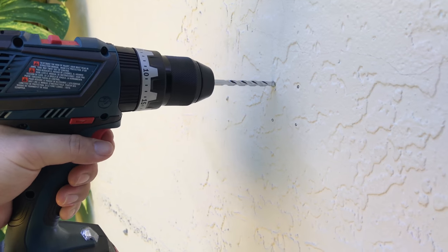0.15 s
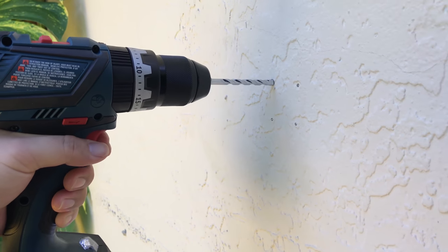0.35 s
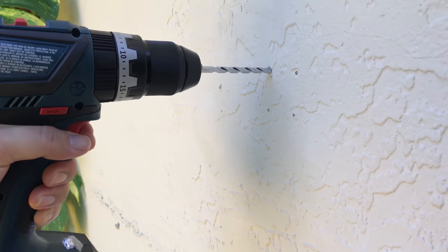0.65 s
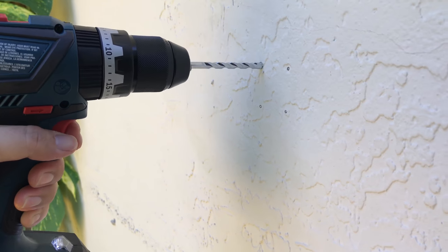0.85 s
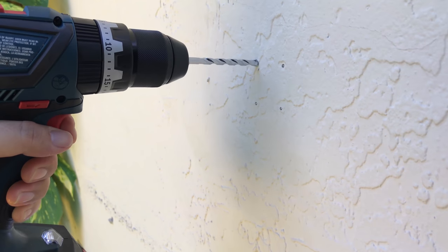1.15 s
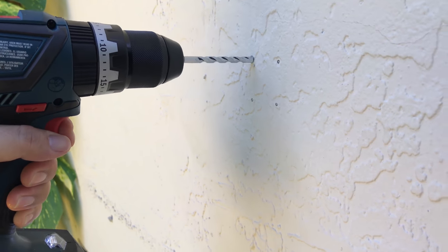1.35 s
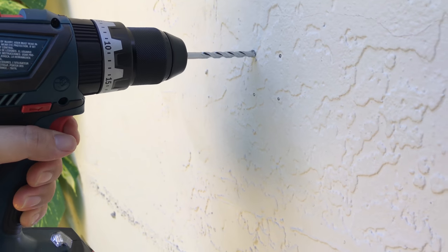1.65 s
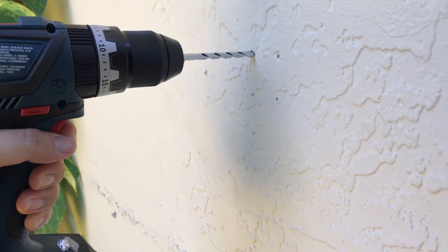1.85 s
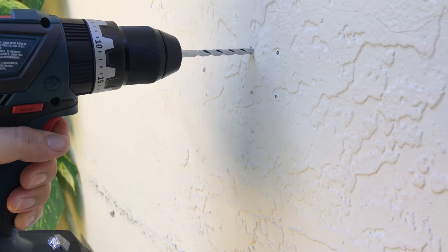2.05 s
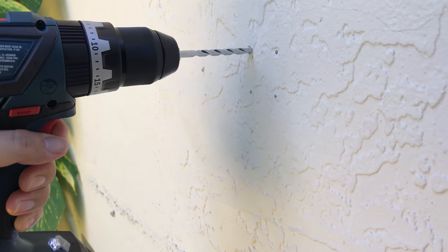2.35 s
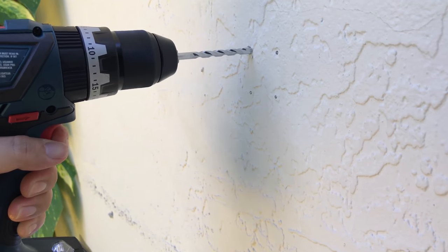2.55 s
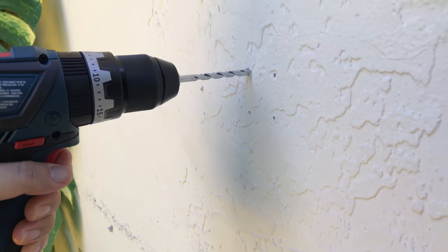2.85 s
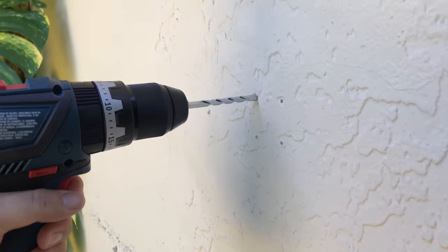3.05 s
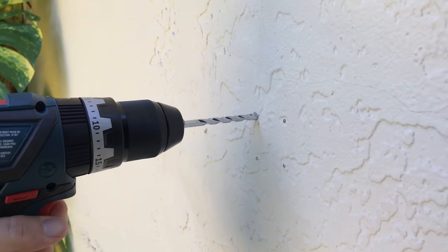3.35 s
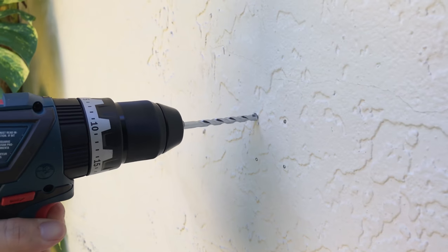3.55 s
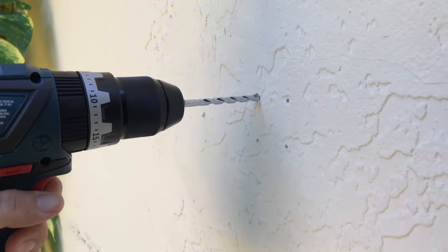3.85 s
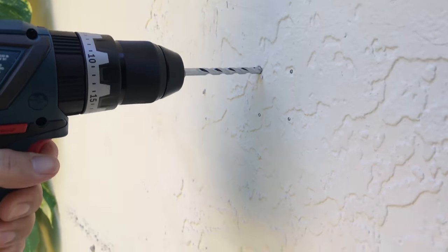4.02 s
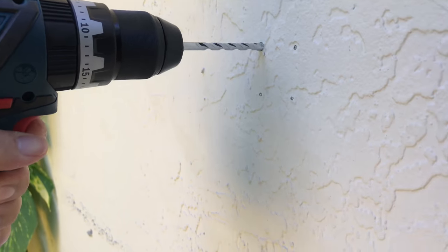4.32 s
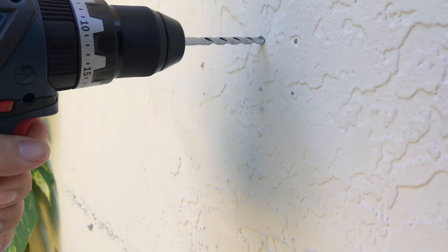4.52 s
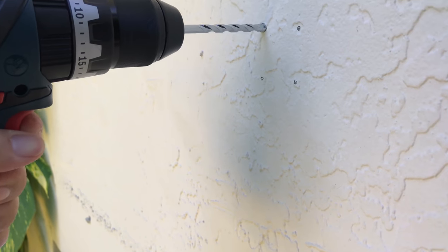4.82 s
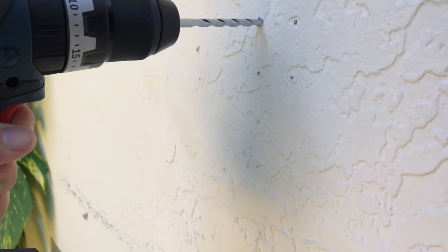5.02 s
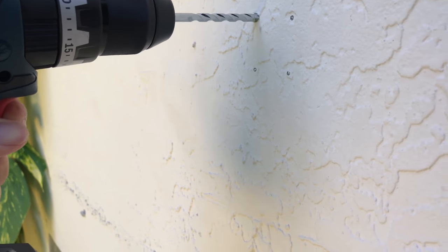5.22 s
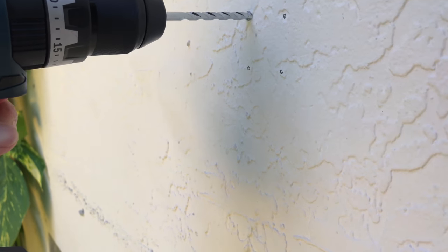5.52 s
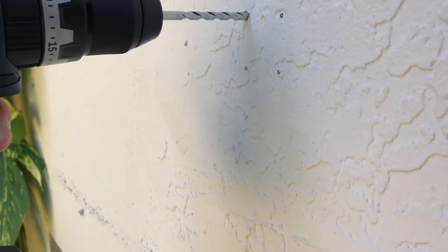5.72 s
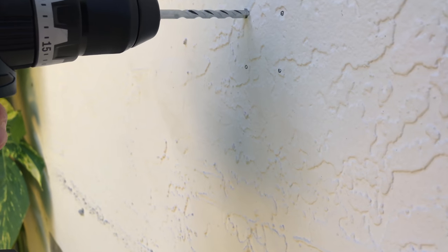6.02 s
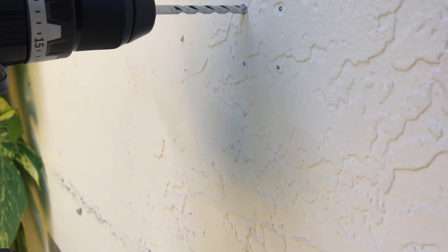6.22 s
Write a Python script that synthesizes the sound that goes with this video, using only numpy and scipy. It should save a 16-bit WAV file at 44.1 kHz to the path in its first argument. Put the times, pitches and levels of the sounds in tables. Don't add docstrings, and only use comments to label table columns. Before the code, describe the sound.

A close phone recording of a cordless hammer drill in a yard. First only low hum, tyre noise, a distant chugging motor and insects. The trigger closes with a short growl and rising cry; rapid blows fuse into a loud gritty grinding with a steady piercing whine and metallic jaw rattle. Bursts of fan air thump the microphone, growing rougher later. The drill never stops.

```python
import sys
import numpy as np
from scipy import signal
from scipy.fft import rfft, irfft, next_fast_len
from scipy.io import wavfile
from scipy.ndimage import uniform_filter1d, map_coordinates

SR = 44100
rng = np.random.default_rng(int(sys.argv[2]) if len(sys.argv) > 2 else 0)


def dump_mix(stems):
    frames = np.atleast_2d(stems).T
    limited = np.clip(frames, -1, 1)
    pcm = np.round(limited * 32767).astype(np.int16)
    wavfile.write(sys.argv[1], SR, pcm)


def amplitude_ratio(level_db):
    exponent = np.asarray(level_db, float) / 20
    return 10 ** exponent


N = 281358

# time in seconds, passing tyres in dB, engine in dB.
YARD = [(0, -49.5, -58), (.25, -52.5, -60), (.55, -53, -55), (.85, -51, -55), (1.25, -56.5, -56),
        (1.55, -57, -57.5), (1.85, -57.5, -54)]
# frequency in Hz, level in dB per Hz.
FAR_TONE = [(15, -54), (25, -46), (53, 0.5), (117, -1), (145, -7.5), (236, -5), (476, -15), (962, -11),
            (2760, -14.5), (3340, -11.5), (4030, -22.5), (5880, -8), (7710, -18.5), (13600, -23),
            (16000, -27)]
# centre in Hz, width in Hz, level in dB.
COWL = [(2350, 320, -9), (3340, 900, -9), (4140, 510, 6.5)]
HUM_DB, INSECTS_DB = -52, 7
CHUG_START_S, CHUG_PERIOD_S, CHUG_JITTER_S, CHUG_DB, CHUG_SCATTER_DB = 0.71, 0.0615, 0.0054, 0.5, 2.2

# time in seconds, peak in dB.
RATTLE = [(1.9143, -28), (1.9477, -28), (1.98, -28), (1.998, -35), (2.0231, -26), (2.043, -28), (2.06, -32),
          (2.1138, -25), (2.126, -27), (2.142, -30), (2.479, -28), (2.5788, -31), (2.8661, -31),
          (2.9075, -21), (3.3056, -29), (3.384, -26), (3.4408, -29), (3.4982, -28), (3.8753, -30),
          (3.9766, -28), (4.1901, -33), (4.3478, -32), (4.5034, -22), (5.1075, -28), (5.6757, -30),
          (5.8229, -30), (5.9461, -25), (5.996, -27)]
CHATTER_PER_S, CHATTER_DB, CHATTER_SCATTER_DB = 14, -35, 1.6
TICK_S, TICK_DB = 1.08, -52
JAWS_LAG, JAWS_DECAY, JAWS_LOOSE = 0.21, 0.27, 0.41

# time in seconds, level in dB, treble in dB, hammer share from 0 to 1.
START = [
    (1.868, -61, -12, 0.48),
    (1.882, -50, -12, 0.28),
    (1.9, -32, -4, 0.6),
    (1.915, -33.5, -4, 0.56),
]
# time in seconds, level in dB.
LOAD = [(1.94, -29.5), (2.0, -29.5), (2.1, -32.5), (3.0, -34), (4.59, -31.5), (5.36, -35.5), (5.66, -33),
        (6.03, -32), (6.38, -34.5)]
# frequency in Hz, level in dB per Hz.
BODY = [(150, -50), (300, -22), (500, -9), (750, -4), (1000, -2.5), (2000, -2), (4000, -1), (7500, -7),
        (11000, -0.5), (15700, -5)]
# centre in Hz, width in Hz, level in dB.
STEEL = [(1570, 700, -9.5), (1895, 920, 0), (3090, 190, -9), (4360, 410, 1), (6340, 1940, 5.5),
         (8280, 450, 0), (9680, 130, 4), (12500, 1800, -2.5), (14300, 750, 1.5)]
# frequency in Hz, level in dB.
STRIKE = [(500, 7.5), (1200, -6), (2500, 1.5), (5000, -3.5), (9000, -8), (14000, -6.5)]
# time in seconds, share (its sign picks which blows).
LIMP = [(2.65, -0.17), (2.85, 0.53), (3.3, 0.46), (3.4, 0.16), (4, -0.051), (4.2, 0.029), (4.7, -.05),
        (4.9, -0.45), (5.1, 0.11), (6.3, -0.33)]
# low edge in Hz, high edge in Hz, size scatter in dB,
# sharp edge over the grinding as a plain factor.
RANGES = [
    (650, 2920, 1.55, 2.95),
    (3330, 10000, 2.1, 1.4),
    (7400, 59000, 2, 1.4),
]
CRACK_DELAY = 30
BLOWS_PER_TURN, FIRST_BLOW = 16 / 55, 21.81
TREBLE_DB, DULLS_PER_DB = -2, 0.26
HAMMER_SHARE, BIT_RING_DB = 0.39, -0.5

# time in seconds, whine in Hz, whine in dB.
SPIN_UP = [(1.87, 2000, -70), (1.92, 4950, -62), (1.94, 6600, -54), (1.96, 8300, -54), (1.98, 9100, -54),
           (2, 9800, -46)]
# time in seconds, whine in Hz, whine in dB.
WHINE = [(2.03, 10131, -47), (2.075, 10274, -45), (2.165, 10067, -41.5), (2.21, 10003, -41),
         (2.3, 10020, -41.5), (2.9, 10028, -42), (2.975, 10058, -41.5), (3.2, 10115, -43),
         (3.72, 10115, -42), (3.85, 10100, -44.5), (4.24, 10082, -43.3), (4.37, 10166, -46.4),
         (4.63, 10203, -52), (4.76, 10253, -56.5), (5.02, 10322, -53.5), (5.8, 10304, -49),
         (6.06, 10292, -45), (6.32, 10281, -48)]
ORDERS = (1, 4, 8, 16, 30)
# early level in dB, late level in dB.
ORDERS_DB = [(-53.5, -54.5), (-53.5, -56), (-54.5, -48.5), (-52.5, -51.5), (-84, -82)]
SLOTS, MESH = 29, 12.364
UP_TO_SPEED_S = 2.03

# time in seconds, rumble in dB.
DRAUGHT = [(2.04, -44), (2.065, -27), (2.31, -27.5), (2.37, -38), (2.77, -25), (2.82, -33.5), (3.1, -35.5),
           (3.14, -25.5), (3.55, -36.5), (3.68, -28), (4.05, -22), (4.39, -35), (4.8, -26), (5.47, -28.5),
           (5.58, -47), (5.86, -38.5), (5.995, -25), (6.38, -32.5)]
# time in seconds, depth in dB, length in seconds.
LULLS = [(2.47, 2.5, 0.045), (2.59, 7, 0.018), (2.68, 24, 0.045), (3.62, 23, .05), (3.87, 20, 0.16),
         (4.1, 17, 0.027), (4.36, -1, 0.043), (4.69, 12, 0.018), (4.79, 21, 0.038), (5.71, 31, 0.11),
         (5.93, 22, 0.077)]
# time in seconds, eddies over the rumble in dB.
AIM = [(2, -5), (3, -6), (3.3, 3), (3.8, -8), (4.06, -6.5), (4.2, 1.5), (4.7, 3.5), (4.95, 5), (5.2, 6),
       (5.42, -4), (5.85, -3), (6.05, -2), (6.38, 2)]
# time in seconds, flutter in dB, sharp part in dB, length in seconds.
PUFFS = [(2.127, -24.5, -44.5, 0.02), (2.544, -29.5, -36, 0.038), (2.624, -31, -36, .042),
         (2.749, -53, -34, 0.027), (3.122, -29.5, -29, 0.035), (3.163, -25, -30, 0.028),
         (3.279, -22.5, -32, 0.041), (3.387, -32, -29.5, 0.026), (3.435, -24.5, -44, 0.018),
         (3.764, -29, -33, 0.031), (3.843, -29, -33, 0.026), (3.957, -24, -36.5, 0.02),
         (4.127, -23.5, -18.5, 0.017), (4.157, -21, -26, 0.023), (4.237, -28, -19.5, .01),
         (4.258, -29.5, -18.5, .02), (4.399, -24.5, -28, 0.028), (4.478, -27.5, -23, .016),
         (4.659, -17.5, -20.5, 0.021), (4.717, -26, -12, 0.014), (4.752, -49, -19, 0.0087),
         (4.811, -27, -32, 0.018), (4.921, -23, -22.5, 0.048), (4.996, -21, -20, 0.056),
         (5.142, -24, -23.5, 0.046), (5.212, -30, -20.5, 0.016), (5.254, -28, -22.5, 0.026),
         (5.348, -24, -27.5, 0.032), (6.095, -23.5, -25, 0.081), (6.225, -21, -22, 0.037)]
# frequency in Hz, level in dB per Hz.
RUMBLE = [(12, -44), (20, -19), (45, 0), (65, 6.5), (118, -1), (165, -9.5), (300, -17), (390, -51),
          (660, -120)]
# frequency in Hz, level in dB.
FLUTTER = [(60, -15), (150, 3), (250, -1), (420, -8.5), (700, -19), (1200, -75)]
# frequency in Hz, level in dB.
SHARP = [(200, 0), (450, 1), (700, 2), (1100, -5.5), (1600, -15.5), (2500, -26)]
EDDY_GAP_S, EDDY_S, EDDY_SCATTER_DB = 0.025, 0.014, 2
SHARP_DB, SHARP_GROWS = -6.5, 0.64
SPRAY_DB, SPRAY_LUMPS_DB = -19.5, 4


def unit(x):
    return x / np.sqrt(np.mean(x ** 2) + 1e-20)


def curves(rows):
    s, *cols = np.transpose(rows)
    return [np.interp(np.arange(N) / SR, s, c) for c in cols]


def wobble(rate):
    knots = rng.standard_normal(int(N * rate / SR) + 4)
    return map_coordinates(knots, [np.arange(N) * rate / SR])


def filtered(x, response):
    m = next_fast_len(N + 8192)
    return irfft(rfft(x, m) * response(np.fft.rfftfreq(m, 1 / SR)), m)[:N]


def colour(points, lo_hz=0, hi_hz=30000):
    f, db = np.transpose(points)

    def gain(hz):
        edges = (1 + (lo_hz / (hz + 1)) ** 8) * (1 + (hz / hi_hz) ** 8)
        return amplitude_ratio(np.interp(np.log(hz + 1), np.log(f), db)) / np.sqrt(edges)
    return gain


def noise(response):
    return unit(filtered(rng.standard_normal(N), response))


def modes(table):
    return lambda f: sum(amplitude_ratio(db) * 1j * f * w / (c * c - f * f + 1j * f * w) for c, w, db in table)


def after(start_s, rise_s):
    return np.clip((np.arange(N) / SR - start_s) / rise_s, 0, 1)


def bumps(rows):
    env = np.zeros(N + SR)
    for s, gain, length in rows:
        shape = np.hanning(int(1.8 * max(length, 0.004) * SR))
        env[round(s * SR) - len(shape) // 2:][:len(shape)] += gain * shape
    return env[:N]


def steady(x, span_s):
    power = np.abs(uniform_filter1d(x ** 2, int(span_s * SR)))
    return x / np.sqrt(power + 0.43)


def yard():
    tyres_db, engine_db = curves(YARD)
    beats = []
    for k, (late, size) in enumerate(rng.standard_normal((19, 2))):
        beat_s = CHUG_START_S + CHUG_PERIOD_S * k + CHUG_JITTER_S * late
        beats.append((beat_s, amplitude_ratio(CHUG_DB + CHUG_SCATTER_DB * size), 0.028))
    chug = bumps(beats)

    def road(f):
        return colour(FAR_TONE, lo_hz=550, hi_hz=1700)(f) * (1 + modes([(1000, 220, -2)])(f))

    def cowl(f):
        return colour(FAR_TONE, lo_hz=1700, hi_hz=4900)(f) * (1 + modes(COWL)(f))

    def chirp(f):
        return colour(FAR_TONE, lo_hz=4900)(f) * (1 + modes([(8700, 900, -6), (12200, 900, -3)])(f))

    hum = amplitude_ratio(HUM_DB + 0.45 * wobble(15)) * noise(colour(FAR_TONE, hi_hz=590))
    tyres = amplitude_ratio(tyres_db + 2.5 + 0.69 * wobble(22.6)) * noise(road)
    engine = amplitude_ratio(engine_db + 3) * (1 + 0.76 * chug) * noise(cowl)
    whistle = np.sin(2 * np.pi * 3130 * np.arange(N) / SR + 1.2 * wobble(60))
    whistle *= amplitude_ratio(-64.5 + 3 * wobble(20)) * (1 - after(0.6, 0.3))
    insects = amplitude_ratio(engine_db + INSECTS_DB) * (1 + 0.5 * chug) * noise(chirp)
    return hum + tyres + engine + whistle + insects


def chuck(turns):
    luck = rng.random((80, 2))
    weak_s = 2.4 + np.cumsum(2 * luck[:, 0]) / CHATTER_PER_S
    weak_db = CHATTER_DB + 2 * CHATTER_SCATTER_DB * (2 * luck[:, 1] - 1)
    bursts = list(RATTLE) + list(zip(weak_s, weak_db))
    env = bumps([(s + 0.005, amplitude_ratio(db - 8), 0.011) for s, db in bursts if s < N / SR])
    env += after(1.905, 0.01) * amplitude_ratio(-47 + 1.5 * wobble(12) + 4.5 * wobble(60))
    since_blow = (BLOWS_PER_TURN * turns + FIRST_BLOW - JAWS_LAG) % 1
    env = env * unit(JAWS_LOOSE + np.exp(-since_blow / JAWS_DECAY))
    env += bumps([(TICK_S, amplitude_ratio(TICK_DB), 0.012)])
    jaws = modes([(14170, 300, 0), (14600, 450, -6)])
    return env * noise(lambda f: jaws(f) ** 2)


def hammer(turns):
    pushed = [(s, db, TREBLE_DB - DULLS_PER_DB * (db + 33.5), HAMMER_SHARE) for s, db in LOAD]
    level_db, treble_db, share = curves(list(START) + pushed)
    limp, = curves(LIMP)
    count = np.maximum(BLOWS_PER_TURN * turns + FIRST_BLOW + 0.011 * wobble(60), 0).astype(int)
    at = np.flatnonzero(np.diff(np.maximum.accumulate(count)) > 0)
    blow = count[at + 1]
    uneven = 1 + np.clip(limp[at], -0.9, 0.9) * (-1) ** blow
    t = np.arange(SR // 50) / SR
    burst = (1 - np.exp(-t / 0.00058)) ** 2 * np.exp(-t / 0.0025)

    def steel(f):
        return colour(BODY)(f) * (0.74 + modes(STEEL)(f))

    struck = np.zeros(N)
    for lo_hz, hi_hz, scatter_db, crack in RANGES:
        blows = np.zeros(N)
        blows[at] = amplitude_ratio(scatter_db * rng.standard_normal(N)[blow]) * uneven
        gated = signal.fftconvolve(blows, burst)[:N] * rng.standard_normal(N)
        gated += crack * np.roll(blows, CRACK_DELAY)
        strike = colour(STRIKE, lo_hz, hi_hz)
        struck += filtered(gated, lambda f: steel(f) * strike(f))
    struck /= np.std(struck[2 * SR:])
    share = np.clip(share, 0, 1)
    hiss = amplitude_ratio(0.86 * wobble(25)) * noise(steel)
    grind = np.sqrt(share) * struck + np.sqrt(1 - share) * hiss
    top = filtered(grind, lambda f: 1 / np.sqrt(1 + (10500 / (f + 1)) ** 12))
    ring = filtered(grind, modes([(2070, 1600, 0)]))
    toned = grind + (amplitude_ratio(treble_db + 1.5) - 1) * top + (amplitude_ratio(BIT_RING_DB) - 1) * ring
    return amplitude_ratio(level_db + 2) * toned


def pull_up(turns):
    growl = bumps([(1.888, amplitude_ratio(-38.5), 0.02)]) * noise(modes([(2910, 780, 0), (4070, 900, -2)]))
    cry = bumps([(1.93, amplitude_ratio(-37.5), 0.03)]) * np.sin(2 * np.pi * 16 * turns)
    return growl + cry


def gears(turns, whine_db):
    late = after(2.8, 1.7)
    whine_db = whine_db + 0.8 + 3.5 * (1 - after(2.12, 0.05)) + wobble(29.75)
    lines = np.sqrt(2) * amplitude_ratio(whine_db) * np.sin(2 * np.pi * SLOTS * turns + 0.25 * wobble(28))
    for order, (early_db, late_db) in zip(ORDERS, ORDERS_DB):
        order_db = early_db + (late_db - early_db) * late + 1.4 * wobble(12)
        lines += np.sqrt(2) * amplitude_ratio(order_db) * np.sin(2 * np.pi * order * turns)
    mesh = np.sin(2 * np.pi * MESH * turns + 0.42 * wobble(60))
    return lines + amplitude_ratio(-45 + 0.65 * wobble(40)) * mesh


def eddies(rumble_db):
    luck = rng.standard_normal((180, 4))
    s = 2.06 + EDDY_GAP_S * (np.arange(180) + 0.3 * luck[:, 0])
    at = np.clip(s * SR, 0, N - 1).astype(int)
    aim_db = curves(AIM)[0][at]
    db = rumble_db[at] + aim_db + EDDY_SCATTER_DB * luck[:, 1]
    sharp_db = db + SHARP_DB + SHARP_GROWS * aim_db + 2.3 * luck[:, 2]
    rows = np.transpose([s, db, sharp_db, EDDY_S * np.exp(0.42 * luck[:, 3])])
    clear = np.all([np.abs(s - top) > length for top, _, _, length in PUFFS], axis=0)
    return list(PUFFS) + list(rows[clear & (s < N / SR)])


def draught():
    rumble_db = curves(DRAUGHT)[0] - bumps(LULLS)
    puffs = eddies(rumble_db)
    swell = 0.51 + bumps([(s, 0.6, 1.35 * length) for s, _, _, length in puffs])
    rumble = amplitude_ratio(rumble_db + 0.5) * swell * steady(noise(colour(RUMBLE, hi_hz=194)), span_s=0.048)
    flutter = amplitude_ratio(rumble_db - 13.5) * unit(amplitude_ratio(4 * wobble(30)) * noise(colour(FLUTTER)))
    eddy_env = bumps([(s, amplitude_ratio(db - 0.5), length) for s, db, _, length in puffs])
    eddy = eddy_env * steady(noise(colour(FLUTTER)), span_s=0.014)
    hiss_env = bumps([(s, amplitude_ratio(db - 2.5) * (db > -41), 0.46 * length) for s, _, db, length in puffs])
    hiss = hiss_env * steady(noise(colour(SHARP)), span_s=0.022)
    spray_db = rumble_db + SPRAY_DB + 1.3 * curves(AIM)[0]
    spray = amplitude_ratio(spray_db) * unit(amplitude_ratio(SPRAY_LUMPS_DB * wobble(70)) * noise(colour(SHARP)))
    return after(2.04, 0.032) * (rumble + flutter + spray) + eddy + hiss


def scene():
    whine_hz, whine_db = curves(list(SPIN_UP) + list(WHINE))
    turns = np.cumsum(whine_hz / SLOTS) / SR
    turns -= turns[round(UP_TO_SPEED_S * SR)]
    motor = after(1.93, 0.08) * gears(turns, whine_db) + hammer(turns)
    drill = after(1.866, 0.006) * motor + chuck(turns) + pull_up(turns)
    return (drill + draught() + yard())[None]


def low_pass(x):
    return signal.sosfilt(signal.butter(12, 16190, fs=SR, output="sos"), x)


def record(dry):
    soft = dry[0] / (1 + np.abs(dry[0] / 0.24) ** 5) ** (1 / 5)
    band = filtered(soft, lambda f: f < 15730)
    return low_pass(band[None])


dry = scene()
out = record(dry)
dump_mix(out)
```